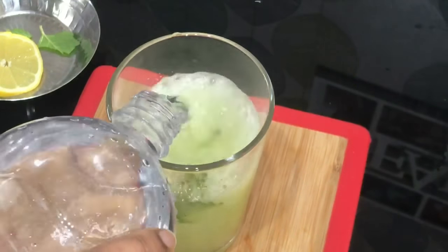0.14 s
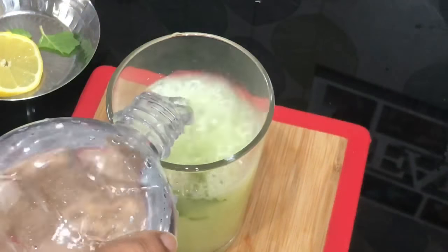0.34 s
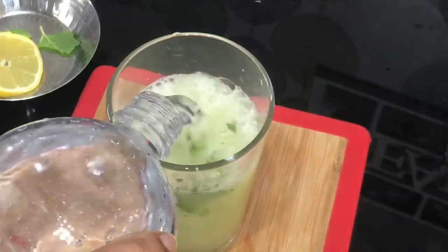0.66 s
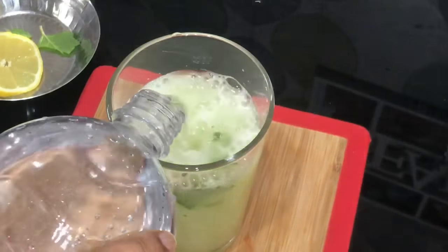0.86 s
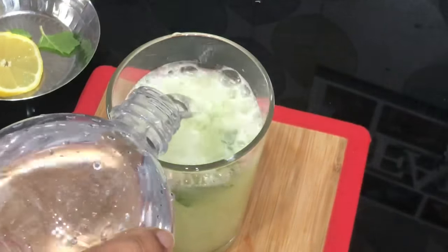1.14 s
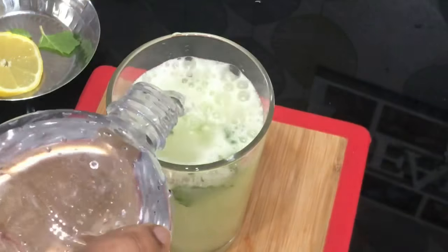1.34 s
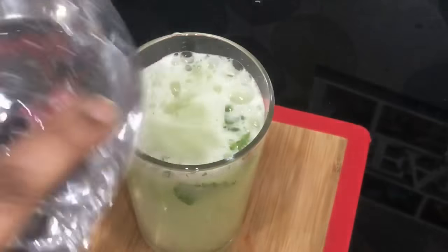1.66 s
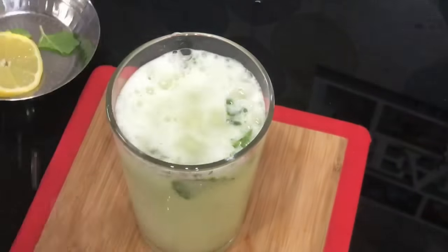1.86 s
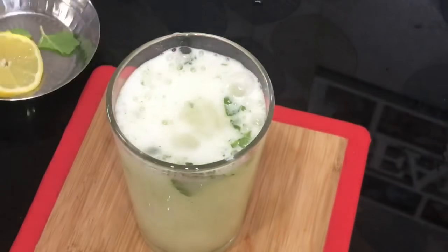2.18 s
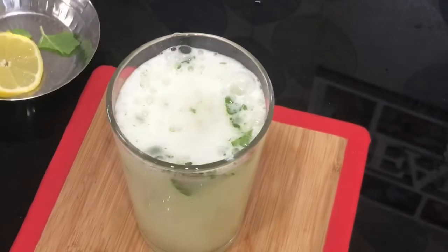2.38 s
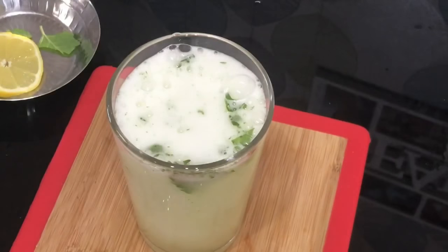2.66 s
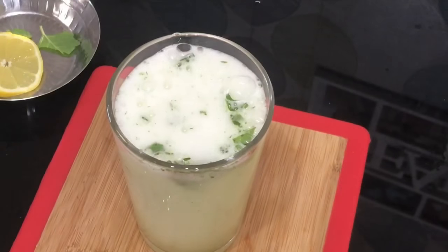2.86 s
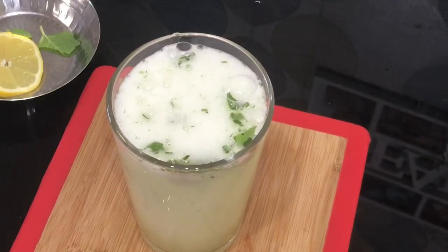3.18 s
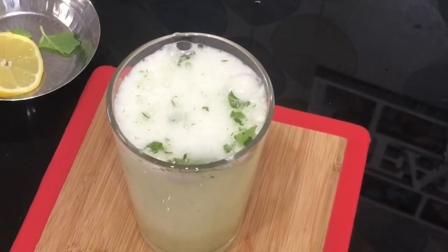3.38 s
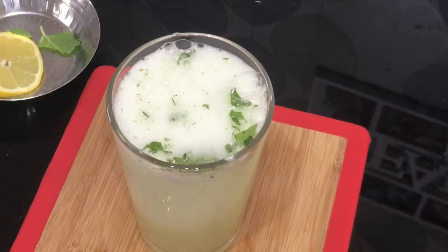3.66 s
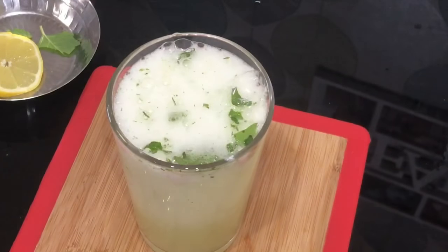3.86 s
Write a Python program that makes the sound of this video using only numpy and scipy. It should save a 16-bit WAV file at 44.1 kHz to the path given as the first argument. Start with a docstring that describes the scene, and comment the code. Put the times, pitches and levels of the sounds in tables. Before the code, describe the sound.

Close up in a small hard-walled kitchen, fizzy water pours into a glass in quick uneven gulps, with bubbling, splashy ticks and hollow bottle booms. Pouring stops after about a second; the thin bottle crackles and sloshes as it is taken away. Foam hisses finely and steadily, then plastic is knocked and slid on the counter, with two loud clacks. Phone microphone, quiet low room tone.

```python
"""Sparkling water runs from a plastic bottle into a glass of lemon drink on a kitchen counter.
Single bubbles and swarms of them ring as decaying tones, and the bottle snaps and booms in its modes.
Sparse spray thickens into the steady fizz of a foam head, made of countless tiny bursts.
Then plastic things are knocked and slid about beside the glass: short contact noise rings through modes.
Kitchen walls echo the sharp sounds over a quiet room tone, and the phone microphone cuts the top."""
import sys
import numpy as np
from scipy import signal
from scipy.fft import rfft, irfft
from scipy.io import wavfile
from scipy.ndimage import uniform_filter1d

SR = 44100
rng = np.random.default_rng(int(sys.argv[2]) if len(sys.argv) > 2 else 0)


def unload_wav(signal):
    """Save mono or channel-first audio to the path in sys.argv[1] as 16-bit WAV at rate SR, clipped to [-1, 1]."""
    wavfile.write(
        sys.argv[1],
        SR,
        np.round(np.clip(np.atleast_2d(signal).T, -1, 1) * 32767).astype(np.int16),
    )


N = 177540
T = np.arange(N) / SR
RING = T[:SR // 2]  # time within one short event [s]
POUR_END_S = 1.35

# air gulps into the tilted bottle: (time [s], wall snap level [dB], boom level [dB],
# gurgle level before the swarm's 1 dB cut [dB])
GULPS = [(0.082, -47.5, -51.5, -55.5), (0.2764, -39, -40, -60), (.432, -49, -54.5, -62),
         (.5942, -45, -55.5, -58), (.874, -45.5, -50, -61), (1.134, -50.5, -57, -82),
         (1.191, -57.5, -58, -59)]
GURGLE_RISE_S, GURGLE_FADE_S = 0.029, 0.039
STREAM_DB, STREAM_FALL_DB_PER_S = -66.5, 6.5  # the stream's own churning thins out
DROPLET_DB, DROPLET_FALL_DB_PER_S = -3.5, 10  # re the churn; the growing foam cushions the splashes


def gurgle():
    """A swarm of middling bubbles under the stream, sparse droplets above; both surge after each gulp."""
    churn = undb(STREAM_DB - STREAM_FALL_DB_PER_S * T) * (T < POUR_END_S)
    for s, _, _, db in GULPS:
        surge = undb(db) * swell(s + GURGLE_RISE_S, GURGLE_RISE_S, GURGLE_FADE_S)
        churn = np.maximum(churn, surge)
    swarm = bursts(700, 810, 1780, spread_db=2.5, cycles=17.5, size=1600)
    droplets = bursts(220, 2700, 7400, spread_db=4.0, cycles=22, size=800)
    # the drink muffles the sharp start of each bubble
    swarm = level(band(swarm, 500, 2200), -1)
    droplets = level(band(droplets, 2000, 10000), 0)
    droplet_gain = undb(DROPLET_DB - DROPLET_FALL_DB_PER_S * T)
    return (swarm + droplets * droplet_gain) * churn


# single bubbles ringing in the water: (time [s], level [dB], pitch before glide and wobble [Hz])
BUBBLES = [(.04, -55, 3600), (.082, -41.5, 1154), (0.1061, -39.5, 1160), (.151, -50.5, 5650),
           (.204, -53.5, 4330), (.224, -51, 3500), (0.3432, -40.5, 1300), (.405, -42, 3900),
           (.451, -46, 5260), (.46, -51, 1060), (0.5962, -45.5, 1510), (.698, -59, 2600),
           (0.844, -59, 3040), (1.108, -56, 1570), (1.19, -52, 630), (1.724, -56, 412), (1.922, -53, 2910),
           (1.943, -56, 3470), (1.949, -45, 1005), (1.949, -52.5, 6000), (2.0162, -46.5, 2920),
           (2.02, -42, 2034), (2.02, -49, 3970), (2.169, -38.5, 1229), (2.2, -54.5, 2010)]
# cycles to fall 60 dB at 1 kHz, in churned and in calm water; smaller bubbles ring for more cycles
CHURNED_CYCLES, CALM_CYCLES, CYCLES_POWER = 12.3, 36, 0.81
CHURNED_GLIDE, CALM_GLIDE = 0.038, 0.052  # share by which a bubble's pitch rises


def bubbles(swell_cycles=0.23, wobble=0.053):
    """Trapped air swells into a ring whose pitch wobbles and rises as it nears the surface."""
    out = np.zeros(N)
    for s, db, hz in BUBBLES:
        churned = s < POUR_END_S
        cycles = CHURNED_CYCLES if churned else CALM_CYCLES
        glide = CHURNED_GLIDE if churned else CALM_GLIDE
        age = hz * RING / (cycles * (hz / 1000) ** CYCLES_POWER)  # 1 when 60 dB down
        pitch = hz * (1 + glide * np.minimum(age, 1) + wobble * wander(size=90))
        turns = np.cumsum(pitch) / SR
        shape = (1 - np.exp(-hz * RING / swell_cycles)) * np.exp(-np.log(1000) * age)
        add(out, s, burst_level(shape * np.sin(2 * np.pi * turns), db))
    return out


# bursting gas: (time [s], fine spray level before a 1 dB lift [dB],
# coarser foam level before a 0.4 dB lift [dB])
FIZZ = [(0.0, -67.5, -68.5), (0.68, -65, -68.5), (1.44, -61, -68), (1.99, -59.5, -58.5), (3.0, -62, -59.5),
        (3.45, -62, -57), (4.02, -62, -58)]
# tone of the fine spray: (frequency [Hz], filter gain [dB])
SPRAY_COLOUR = [(1760, -12.5), (3000, -47), (3500, -22), (3830, -5), (4340, -13), (4850, -11), (5850, -5.5),
                (8050, -2.5), (9000, 0.5), (10500, -5), (11700, 1.5), (14800, 0.5), (15800, -3.5)]
# tone of the foam: (frequency [Hz], filter gain [dB])
FOAM_COLOUR = [(500, -2), (1000, -5.5), (2000, -5), (3000, -1.5), (4000, 3), (5000, 0.5), (6500, 4.5),
               (8500, -2.5), (12000, -7)]
# bursts per second multiply as the head of foam builds, until it covers the drink
FIRST_BURSTS_PER_S, FULL_BURSTS_PER_S, FOAM_DOUBLING_S = 1000, 15000, .47
POP_RATE_PER_S, POP_DB = 58, -77  # the few larger bubbles that burst in the foam


def fizz():
    """Fine spray above the stream, the lower hiss of the foam as it builds, and faint pops."""
    spray_db, foam_db = curves(FIZZ)
    rate = np.minimum(FIRST_BURSTS_PER_S * 2 ** (T / FOAM_DOUBLING_S), FULL_BURSTS_PER_S)
    spray = colour(bursts(rate, 4900, 13700, spread_db=0.5, cycles=2.9), SPRAY_COLOUR)
    foam = colour(bursts(rate, 1150, 17000, spread_db=3.5, cycles=2.1), FOAM_COLOUR)
    pops = bursts(POP_RATE_PER_S, 2260, 10200, spread_db=0.5, cycles=18, size=300)
    hiss = level(spray, 1.0) * undb(spray_db) + level(foam, 0.4) * undb(foam_db)
    return hiss + level(pops, POP_DB)


# tone of one wall snap: (frequency [Hz], filter gain [dB])
CRACKLE_COLOUR = [(130, -9), (270, -4.5), (400, -5.5), (680, -16), (1050, 8), (1500, 8), (2100, -5.5),
                  (3500, -4), (5000, -9), (9000, -3.5), (15000, -13)]


def snap(snap_s=0.0021):
    """One dry snap of the thin bottle wall."""
    return colour(contact(snap_s), CRACKLE_COLOUR)


# the thin bottle wall snaps under the fingers: (time [s], level [dB], bass re level [dB])
CRACKLES = [(.451, -48, -8), (1.473, -59.5, -25), (1.724, -58.5, 1), (1.7482, -51.5, -3), (1.777, -49, -11),
            (1.808, -44.5, -15), (2.018, -43, -12), (2.0736, -45, -3)]
CRACKLE_TREBLE_DB = -7  # re the snap
GULP_BASS_DB, GULP_TREBLE_DB = 3, -11  # the snap's bass re the boom, its treble re the snap
# thin, bright ticks of bursting spray bubbles: (time [s], level [dB])
TICKS = [(.094, -56), (.119, -45), (.1675, -53.5), (.2796, -42), (0.438, -47), (2.018, -45.5), (2.041, -50)]
# tone of a tick: (frequency [Hz], filter gain [dB])
TICK_COLOUR = [(2500, -13), (5000, -5), (8000, 1), (11000, -1.5), (15000, -3)]
TICK_S = .001


def crackles():
    """The wall snaps at each gulp and under the fingers; thin ticks of bursting spray sound among them."""
    out = np.zeros(N)
    for s, db, boom_db, _ in GULPS:
        bass_db = boom_db + GULP_BASS_DB - db
        add(out, s, balance(snap(), db, bass_db, GULP_TREBLE_DB))
    for s, db, bass_db in CRACKLES:
        add(out, s, balance(snap(), db, bass_db, CRACKLE_TREBLE_DB))
    for s, db in TICKS:
        add(out, s, burst_level(colour(contact(TICK_S), TICK_COLOUR), db))
    return out


# hollow ring of the bottle: (multiple of the boom pitch, level re the other modes [dB], t60 [s])
BOTTLE_MODES = [(0.471, -12.5, 1), (1.002, 8.5, 0.48), (1.75, -4.5, 0.098), (2.44, -2, 0.4),
                (2.95, -6.5, 0.35), (4.45, -12.5, 0.51)]


def boom(db, hz, sag=0.051, slosh=0.038):
    """The air in the bottle and its soft wall ring together; sloshing water bends each mode."""
    ring = 0
    for multiple, mode_db, t60 in BOTTLE_MODES:
        pitch = hz * multiple * (1 - sag * RING + slosh * wander(size=500))
        turns = np.cumsum(pitch) / SR
        ring = ring + undb(mode_db) * np.sin(2 * np.pi * turns) * np.exp(-np.log(1000) * RING / t60)
    return burst_level(ring, db)


GLUG_FROM_HZ, GLUG_TO_HZ, GLUG_FALL_S, GLUG_T60_S = 469, 204.3, .025, .17


def glug(wobble=.16):
    """The entering air grows inside the bottle and its unsteady note falls."""
    hz = GLUG_TO_HZ + (GLUG_FROM_HZ - GLUG_TO_HZ) * np.exp(-RING / GLUG_FALL_S)
    turns = np.cumsum(hz * (1 + wobble * wander(size=200))) / SR
    return np.sin(2 * np.pi * turns) * np.exp(-np.log(1000) * RING / GLUG_T60_S)


# water sloshes in the upright bottle: (time [s], first boom level [dB], first boom pitch [Hz])
SLOSHES = [(1.775, -62.5, 192), (2.032, -54, 193), (2.561, -53, 183.1)]
SWING_S, SWING_LOSS_DB, SWING_PITCH_DROP = 0.13, 4.5, 0.019  # each time the water swings back
BOOM_HZ, GLUG_DB = 143.8, -1.5  # the glug's level is re the boom
HEAVY_DB, KNOCK_BOOM_DB = -35, -30.5  # blows above HEAVY_DB boom the bottle; boom re the blow


def booms(count=3):
    """The hollow bottle booms at each gulp, at each swing of the water and under heavy blows."""
    out = np.zeros(N)
    for s, _, db, _ in GULPS:
        add(out, s, boom(db, BOOM_HZ) + burst_level(glug(), db + GLUG_DB))
    for s, db, hz in SLOSHES:
        for swing in range(count):
            swing_hz = hz * (1 - swing * SWING_PITCH_DROP)
            add(out, s + swing * SWING_S, boom(db - swing * SWING_LOSS_DB, swing_hz))
    for s, db, _, _ in KNOCKS:
        if db > HEAVY_DB:
            add(out, s, boom(db + KNOCK_BOOM_DB, BOOM_HZ))
    return out


# plastic meets the counter: (time [s], level [dB], contact decay [s], strongest resonance [Hz])
KNOCKS = [(2.558, -43, 0.0051, 1470), (2.841, -47.5, 0.0037, 1180), (2.975, -53.5, 0.005, 1060),
          (2.9888, -45.5, 0.00095, 1170), (3.135, -47, 0.0043, 852), (3.1731, -32, 0.0051, 1390),
          (3.182, -24.5, 0.0037, 1870), (3.1873, -18.5, .0012, 2680), (3.3236, -43.5, 0.0039, 2440),
          (3.345, -39.5, 0.005, 2420), (3.379, -46, .004, 860), (3.394, -37.5, 0.0063, 827),
          (3.462, -47, 0.0054, 880), (3.487, -39, 0.0025, 2520), (3.5365, -43.5, 0.0038, 1160),
          (3.621, -47.5, 0.0012, 770), (3.632, -42, 0.0023, 1160), (3.65, -42, 0.0059, 2860),
          (3.695, -49.5, 0.0044, 1000), (3.7348, -35, 0.0022, 1530), (3.738, -23, 0.0013, 2660),
          (3.848, -35, 0.0046, 3000)]
# overall tone of the plastic: (frequency [Hz], filter gain [dB])
KNOCK_COLOUR = [(90, -8.5), (150, -4.5), (235, -1.5), (285, -4.5), (480, -2.5), (900, -2), (1400, 0),
                (1950, -2), (2300, -0.5), (3650, 0), (4400, -7), (6800, -17), (8300, -10.5), (10000, -17.5),
                (15500, -20)]
# what the knocks ring with: (frequency [Hz], half width [Hz], lift [dB])
KNOCK_MODES = [(193, 31, 1), (338.6, 23, 11.5), (718, 23, 6.5), (852, 9, 5.5), (974, 80, 5.5),
               (1180, 57, 1.5), (1655, 39, 6), (1780, 27, 6.5), (2460, 120, 4), (2760, 77, 3),
               (3030, 70, 0), (3430, 66, 4), (3750, 57, 3)]
LIGHT_TREBLE_DB, HEAVY_TREBLE_DB = -14, -11.5  # re the blow; heavy blows are brighter
REBOUND_S, REBOUND_DB, REBOUND_TOP_DB = .0105, -10.5, -46  # the hand keeps the bounce small
# bass equals the middle near this resonance, up to a cap, and thins as the spot gets stiffer
BASS_SPOT_HZ, BASS_DB_PER_OCTAVE, BASS_TOP_DB = 1000, -6.5, -0.5
SOFT_DB_PER_OCTAVE, SOFT_TOP_HZ = -5, 4000  # a soft spot also dulls the middle above its resonance


def knocks(resonance_db=5.5):
    """Dull plastic blows ring the body's modes and bounce once; the spot hit favours a broad resonance."""
    out, grid = np.zeros(N), np.geomspace(80, 16000, 700)
    hz, colour_db = np.transpose(KNOCK_COLOUR)
    body_db = np.interp(np.log(grid), np.log(hz), colour_db)
    for mode_hz, width, lift in KNOCK_MODES:
        body_db = body_db + lift / (1 + ((grid - mode_hz) / width) ** 2)
    for s, db, decay_s, spot_hz in KNOCKS:
        peak_db = resonance_db * np.exp(-(2 * np.log2(grid / spot_hz)) ** 2)
        octaves_above = np.log2(np.clip(grid, spot_hz, SOFT_TOP_HZ) / spot_hz)
        tone = np.c_[grid, body_db + peak_db + SOFT_DB_PER_OCTAVE * octaves_above]
        bass_db = min(BASS_DB_PER_OCTAVE * np.log2(spot_hz / BASS_SPOT_HZ), BASS_TOP_DB)
        treble_db = HEAVY_TREBLE_DB if db > HEAVY_DB else LIGHT_TREBLE_DB
        rebound_db = min(db + REBOUND_DB, REBOUND_TOP_DB)
        for at, blow_db in [(s, db), (s + REBOUND_S, rebound_db)]:
            blow = colour(contact(decay_s), tone)
            add(out, at, balance(blow, blow_db, bass_db, treble_db))
    return out


def thud(db=-36, hz=195, t60=0.089, rise_s=.003):
    """The heaviest blow also shakes the counter, which rings as one low decaying tone."""
    out = np.zeros(N)
    s = max(KNOCKS, key=lambda row: row[1])[0]
    shape = (1 - np.exp(-RING / rise_s)) * np.exp(-np.log(1000) * RING / t60)
    add(out, s, burst_level(np.sin(2 * np.pi * hz * RING) * shape, db))
    return out


# short drags over the counter: (time at the fastest [s], level before a 0.7 dB cut [dB], fade [s])
SLIDES = [(3.15, -52.5, 0.041), (3.33, -50.5, 0.018), (3.518, -48.5, 0.042), (3.645, -52, 0.017),
          (3.712, -47.5, 0.05), (3.795, -46.5, 0.057)]
SLIDE_RISE_S = 0.026
# heavy blows leave the plastic rattling; level re the blow, before the same cut
RATTLE_DB, RATTLE_LAG_S, RATTLE_RISE_S, RATTLE_FADE_S = -20, 0.01, 0.0056, 0.04


def sliding():
    """Plastic drags over the counter in tiny slips, and rattles on after heavy blows."""
    strokes = [undb(db) * swell(s, SLIDE_RISE_S, fade_s) for s, db, fade_s in SLIDES]
    for s, db, _, _ in KNOCKS:
        if db > HEAVY_DB:
            rattle = swell(s + RATTLE_LAG_S, RATTLE_RISE_S, RATTLE_FADE_S)
            strokes.append(undb(db + RATTLE_DB) * rattle)
    slips = bursts(1400, 450, 4250, spread_db=2.5, cycles=4.7, size=500)
    return level(colour(slips, KNOCK_COLOUR), -0.7) * np.max(strokes, axis=0)


# kitchen echo: (frequency [Hz], level re direct sound [dB], t60 [s])
KITCHEN = [(151, -3, 0.19), (504, -7, 0.19), (1300, -6, 0.18), (2800, -9.5, 0.19), (6000, -6.5, 0.15),
           (14000, -13, 0.088)]


def kitchen(x, build_s=0.0023):
    """Hard walls answer within milliseconds; the treble dies first."""
    hz, wet_db, t60 = np.transpose(KITCHEN)
    edges = np.geomspace(80, 17000, 10)
    echo = 0
    for lo, hi in zip(edges, edges[1:]):
        centre = np.log(lo * hi) / 2
        db = np.interp(centre, np.log(hz), wet_db)
        decay = np.interp(centre, np.log(hz), t60)
        shape = np.exp(-np.log(1000) * RING / decay) * (1 - np.exp(-RING / build_s))
        tail = band(rng.standard_normal(len(RING)), lo, hi) * shape
        # scaled by the band's share of the spectrum
        echo = echo + undb(db) * tail * np.sqrt(2 * (hi - lo) / SR / np.sum(tail ** 2))
    return x + signal.fftconvolve(x, echo)[:N]


# tone of the quiet kitchen: (frequency [Hz], filter gain [dB])
ROOM_TONE = [(20, -27), (35, -3.5), (48, 2), (68, -2), (90, -5), (130, -7.5), (200, -6), (300, -13.5),
             (550, -17), (800, -25.5), (2000, -29.5), (4000, -29.5)]
ROOM_TONE_DB = -66


def room_tone():
    """The steady, mostly low background of the kitchen, as filtered noise."""
    return level(colour(rng.standard_normal(N), ROOM_TONE), ROOM_TONE_DB)


def bursts(rate, lo_hz, hi_hz, spread_db, cycles, size=64):
    """Many short grains, each a few cycles at its own pitch; a few are much louder."""
    rate = rate * np.ones(N)  # per second
    at = np.flatnonzero(rng.random(N) < rate / SR)
    pitch, rank, sign = rng.random((len(at), 3)).T[:, :, None]
    age = np.arange(size)  # samples
    turns = (lo_hz + (hi_hz - lo_hz) * pitch) * age / SR
    loudness = undb(-spread_db * np.log(rank + 0.012))
    # dividing by the root of the rate keeps a denser swarm equally loud
    gain = np.sign(sign - .5) * loudness / np.sqrt(rate[at, None])
    grains = gain * np.sin(2 * np.pi * turns) * np.exp(-np.log(1000) * turns / cycles)
    return np.bincount((at[:, None] + age).ravel(), grains.ravel(), N)[:N]


def contact(decay_s):
    """A sharp push followed by a dying chatter of noise."""
    return rng.standard_normal(len(RING)) * np.exp(-RING / decay_s) + 2.54 * (RING == 0)


def balance(x, db, bass_db, treble_db):
    """Weight and hardness of a blow set its bass and treble against the middle."""
    bass = burst_level(band(x, 130, 650), db + bass_db)
    middle = burst_level(band(x, 700, 4200), db)
    treble = burst_level(band(x, 5000, 17000), db + treble_db)
    return bass + middle + treble


def swell(s, rise_s, fade_s):
    """A level that climbs to 1 at time s and dies away again."""
    return np.exp(-np.maximum((s - T) / rise_s, (T - s) / fade_s))


def wander(size):
    """Smooth chance of spread 1, changing about every size samples."""
    return level(uniform_filter1d(rng.standard_normal(len(RING)), size=size), 0)


def undb(db):
    """Decibels to gain."""
    return 10 ** (np.asarray(db) / 20)


def curves(table):
    """Each column of a table as a line through time."""
    s, *columns = np.transpose(table)
    return [np.interp(T, s, c) for c in columns]


def level(x, db):
    """Set the mean (RMS) level."""
    return x * undb(db) / np.sqrt(np.mean(x ** 2))


def burst_level(x, db):
    """Set the level of the loudest 5 ms."""
    power = uniform_filter1d(x ** 2, size=220, mode="constant")
    return x * undb(db) / np.sqrt(power.max())


def band(x, lo_hz, hi_hz):
    """Causal band-pass."""
    edges = [lo_hz, min(hi_hz, SR / 2 - 1)]
    return signal.sosfilt(signal.butter(3, edges, "band", fs=SR, output="sos"), x)


def colour(x, points):
    """Causal (minimum-phase) filter through (Hz, dB) points."""
    hz, db = np.transpose(points)
    size = 4096
    grid = np.maximum(np.fft.rfftfreq(size, 1 / SR), 1)
    cepstrum = irfft(np.log(undb(np.interp(np.log(grid), np.log(hz), db))))
    # folding the cepstrum forward puts the response after the start
    cepstrum[1:size // 2] *= 2
    cepstrum[size // 2 + 1:] = 0
    return signal.fftconvolve(x, irfft(np.exp(rfft(cepstrum))))[:len(x)]


def add(out, s, x):
    """Mix x in at time s."""
    i = max(int(s * SR), 0)
    out[i:i + len(x)] += x[:max(N - i, 0)]


def scene():
    """Drink, bottle and knocks in a quiet kitchen; only the sharp sounds are echoed by the walls."""
    sharp = gurgle() + bubbles() + crackles() + knocks() + sliding()
    direct = fizz() + booms() + thud()
    return (kitchen(sharp) + direct + room_tone())[None]


TOP_HZ = 15950


def record(dry):
    """The phone microphone cuts the top steeply."""
    return signal.sosfilt(signal.ellip(10, .1, 70, TOP_HZ, fs=SR, output="sos"), dry)


dry = scene()
out = record(dry)
unload_wav(out)
```